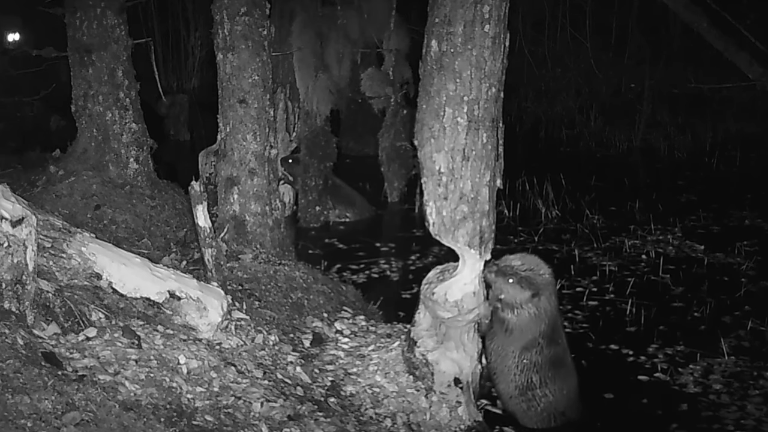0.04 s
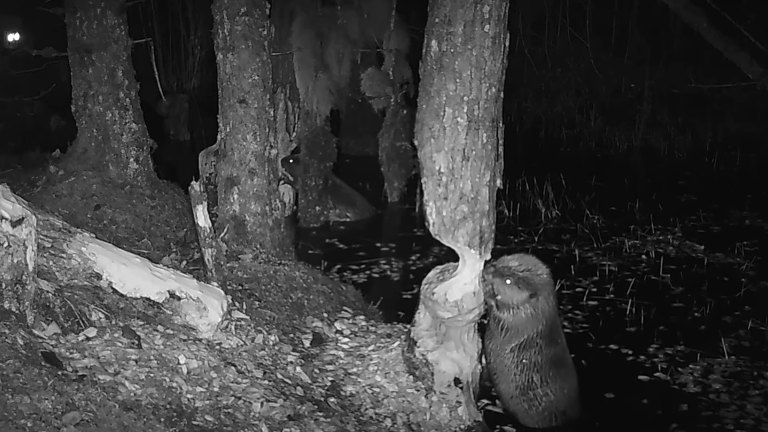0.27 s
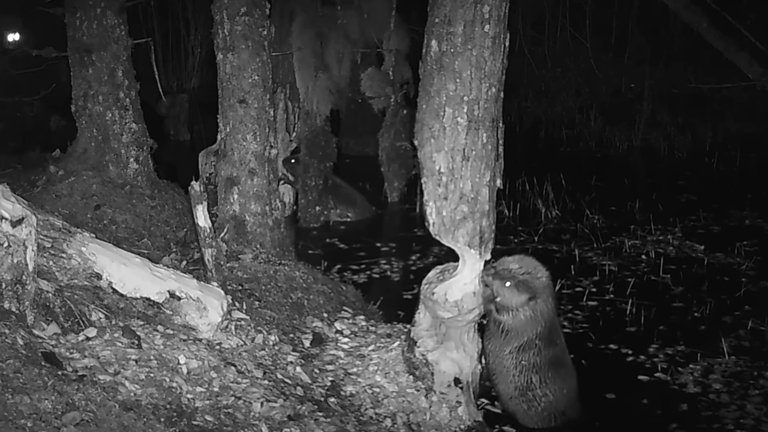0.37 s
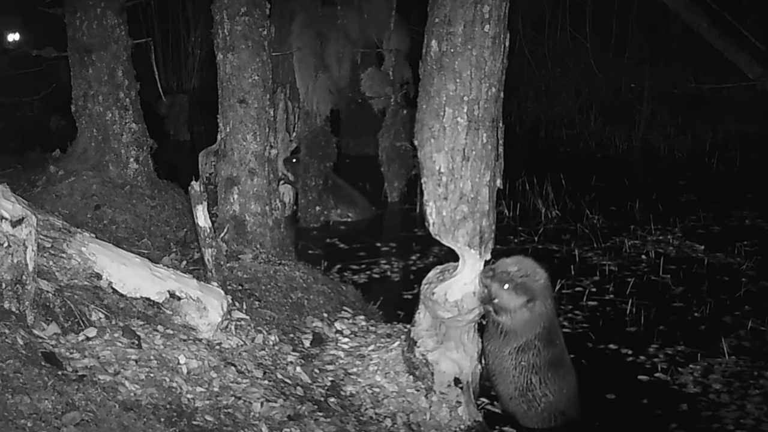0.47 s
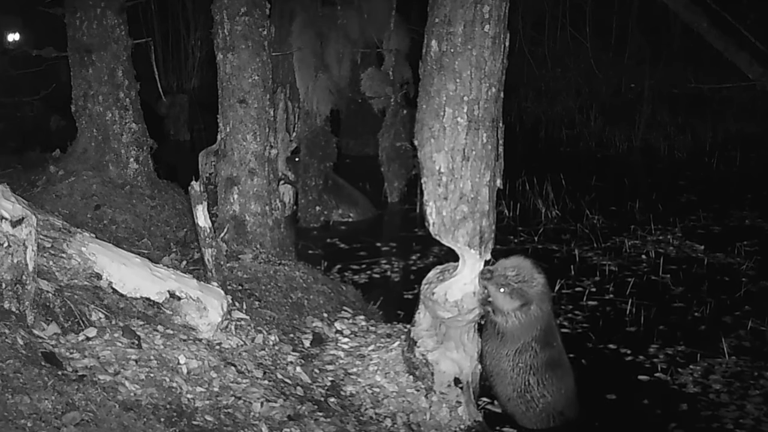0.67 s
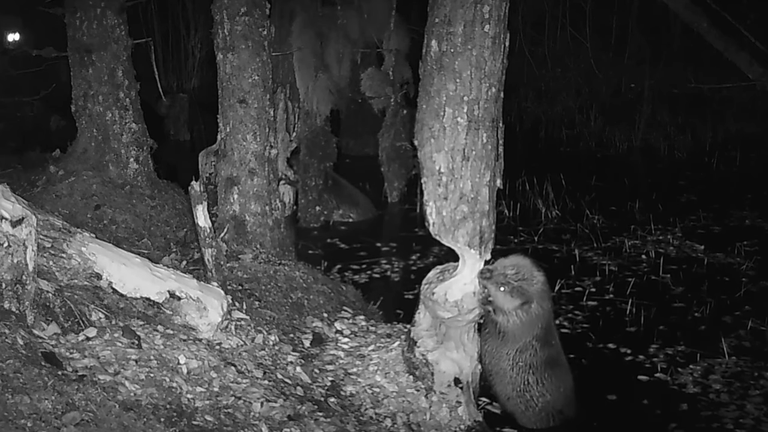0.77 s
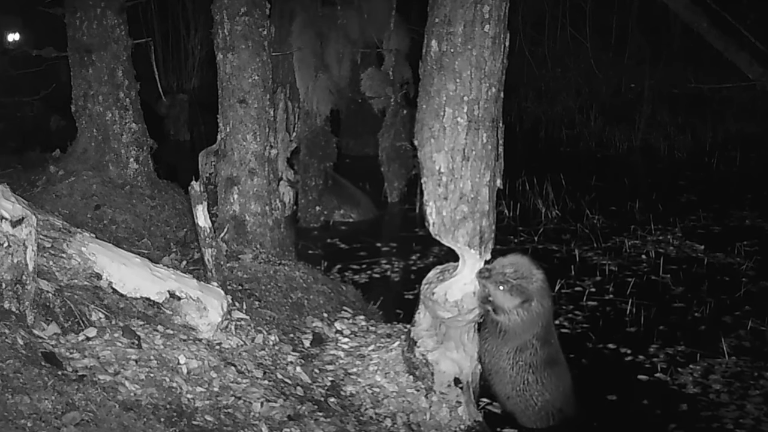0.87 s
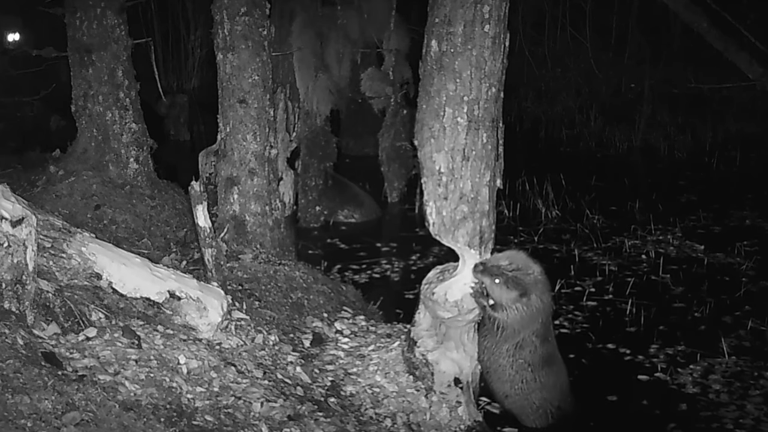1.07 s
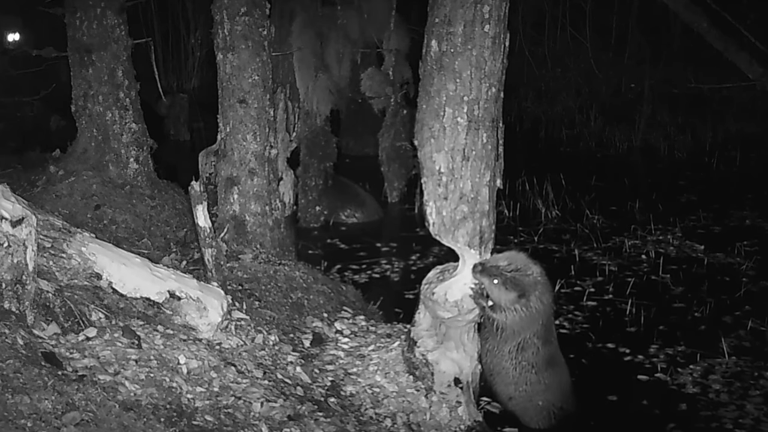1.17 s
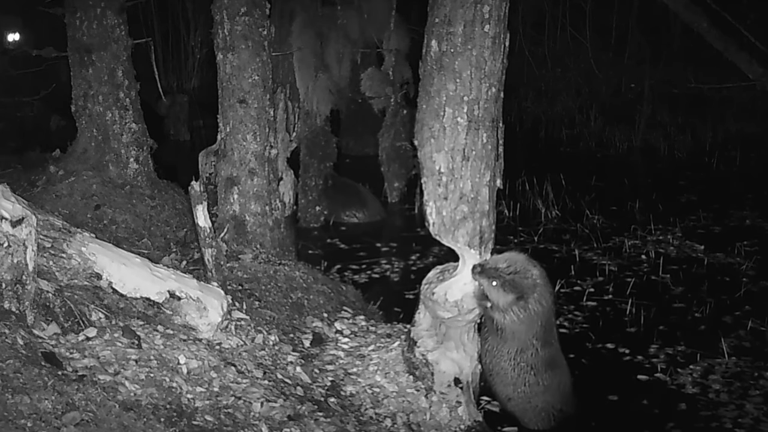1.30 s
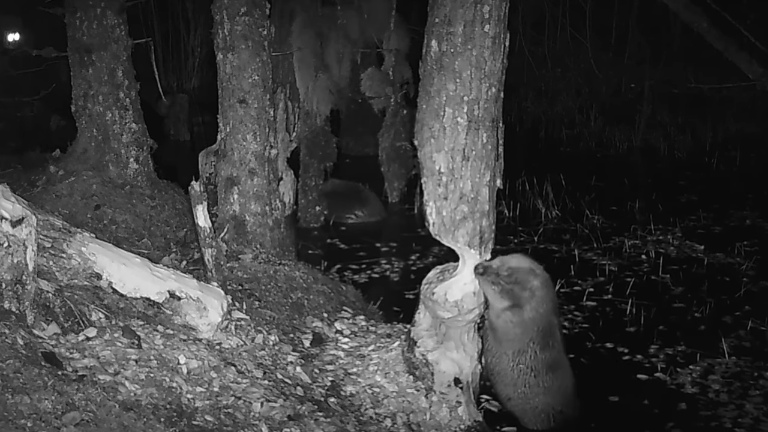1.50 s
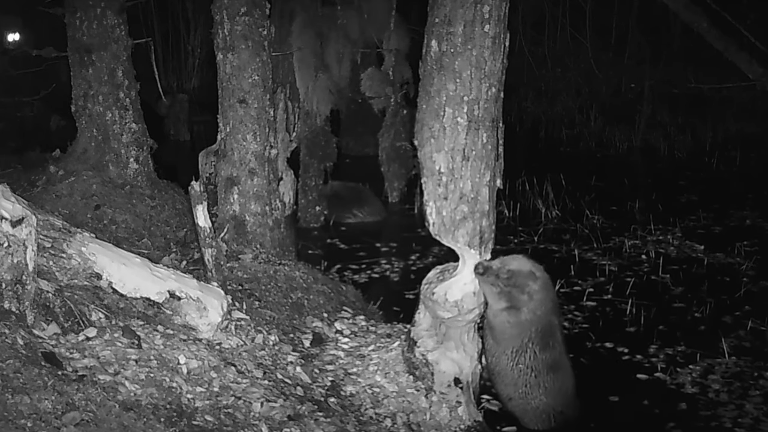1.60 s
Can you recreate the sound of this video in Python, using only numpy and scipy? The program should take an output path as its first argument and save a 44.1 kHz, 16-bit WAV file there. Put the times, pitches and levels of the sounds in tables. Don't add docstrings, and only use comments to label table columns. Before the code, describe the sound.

A beaver gnawing a tree trunk: two sharp wood snaps, then faint nibbles, over chirps and hiss

```python
import sys
import numpy as np
from scipy import signal
from scipy.fft import rfft, irfft
from scipy.io import wavfile

SR = 44100
rng = np.random.default_rng(int(sys.argv[2]) if len(sys.argv) > 2 else 0)


def waveform_to_disk(signal):
    frames = np.transpose(np.atleast_2d(signal))
    scaled = np.clip(frames, -1, 1) * 32767
    samples = np.round(scaled).astype(np.int16)
    wavfile.write(sys.argv[1], SR, samples)


def to_linear_factor(level_db):
    exponent = np.asarray(level_db, float) / 20
    return 10 ** exponent


N = 72765


def at_hz(points, hz):
    points_hz, points_db = np.transpose(points)
    return np.interp(np.log(hz), np.log(points_hz), points_db)


def rms_one(x):
    return x / np.sqrt(np.mean(x ** 2) + 1e-20)


def drift(rate_hz):
    pole = np.exp(-2 * np.pi * rate_hz / SR)
    white = rng.standard_normal(N + SR)
    return rms_one(signal.lfilter([1], [1, -2 * pole, pole * pole], white)[SR:])


def ring(clicks, hz, t60_s):
    pole, w = to_linear_factor(-60 / (t60_s * SR)), 2 * np.pi * hz / SR
    return signal.lfilter([0, np.sin(w)], [1, -2 * pole * np.cos(w), pole * pole], clicks + 1e-18)


def buzz():
    rate_hz, start_s, width_turns = 58.7, .0063, .11
    turn = (np.arange(N) / SR - start_s) * rate_hz % 1 - .5
    return np.exp(-.5 * ((.5 - abs(turn)) / width_turns) ** 2)


def hiss():
    # frequency in Hz, density in dB per Hz.
    colour = [(18, -40), (30, -13.5), (279, -5.5), (883, 1), (2950, -3), (5540, -9.5), (5990, -10.5),
              (9860, -13), (15800, -22.5)]
    level_db, patchy_db = -49.5, .78
    edges_hz = 22 * 2 ** np.arange(0, 9.7, .5)
    white = rng.standard_normal((2, N + SR))
    bump, out = buzz(), np.zeros(N)
    for k, (low_hz, high_hz) in enumerate(zip(edges_hz, edges_hz[1:])):
        band_filter = signal.butter(2, [low_hz, high_hz], "band", fs=SR, output="sos")
        band = signal.sosfilt(band_filter, white[k % 2])[SR:]
        mid_hz = np.sqrt(low_hz * high_hz)
        lift_db = at_hz([(1500, 1), (6000, 4)], mid_hz)
        out += band * to_linear_factor(at_hz(colour, mid_hz) + lift_db * bump + patchy_db * drift(21))
    return to_linear_factor(level_db) * rms_one(out)


def whistles():
    # frequency in Hz, level in dB rms.
    high_tones = [(6029, -77), (6557, -79), (7440, -80), (7494, -78), (7537, -78), (7655, -79), (7773, -79),
                  (7849, -80), (8495, -80), (9179, -82), (9620, -81), (9905, -82), (12134, -88),
                  (14433, -88)]
    # frequency in Hz, level in dB rms.
    low_tones = [(59.2, -78.5), (861.3, -72.5), (1448, -67)]
    trim_db, waver_hz, chop_db = -1, 3, 7
    out = np.zeros(N)
    for hz, db in [*high_tones, *low_tones]:
        turns = np.cumsum(hz + waver_hz * drift(8.4)) / SR + rng.random()
        out += to_linear_factor(db + trim_db) * np.sqrt(2) * np.sin(2 * np.pi * turns)
    return rms_one(to_linear_factor(chop_db * buzz())) * out


def chirps(rows, lead_s, length_s, swell_db, gap_db, glide_hz):
    edge_s, octave_db = .002, -13
    catch_place, catch_width = .55, .07
    t, out = np.arange(N) / SR, np.zeros(N)
    waver_hz = 55 * drift(120)
    for start_s, hz, db in rows:
        share = (t - start_s - lead_s) / length_s
        gate = np.clip(np.minimum(share, 1 - share) * length_s / edge_s, 0, 1)
        catch_db = gap_db * np.exp(-.5 * ((share - catch_place) / catch_width) ** 2)
        phase = 2 * np.pi * np.cumsum(hz + waver_hz + glide_hz * (share - .5)) / SR
        level = to_linear_factor(db + swell_db * (np.clip(share, 0, 1) - .5) + catch_db)
        tone = np.sin(phase) + to_linear_factor(octave_db) * np.sin(2 * phase)
        out += gate * level * np.sqrt(2) * tone
    return out


def low_chirps():
    # start in seconds, pitch in Hz, level in dB.
    chirp_rows = [(0.075, 2632, -54.6), (0.125, 2648, -53.7), (0.375, 2557, -53.2), (0.475, 2643, -53.3),
                  (0.625, 2508, -52.8), (0.675, 2562, -55.0), (0.875, 2610, -53.0), (1.075, 2675, -53.9),
                  (1.125, 2637, -52.1), (1.275, 2664, -53.4), (1.375, 2600, -52.7), (1.475, 2659, -52.4),
                  (1.625, 2487, -53.1)]
    return chirps(chirp_rows, lead_s=-.002, length_s=.027, swell_db=4, gap_db=-1.5, glide_hz=50)


def high_chirps():
    # start in seconds, pitch in Hz, level in dB.
    chirp_rows = [(0.025, 2982, -52.5), (0.175, 2971, -53.6), (0.325, 2906, -53.9), (0.425, 2987, -55.3),
                  (0.525, 2923, -51.9), (0.575, 3014, -51.6), (0.725, 2890, -53.3), (0.775, 3025, -50.7),
                  (0.825, 3106, -55.0), (0.925, 2874, -53.3), (0.975, 3073, -52.3), (1.025, 3073, -52.5),
                  (1.175, 2987, -52.8), (1.225, 3063, -53.2), (1.325, 2874, -52.9), (1.425, 2944, -56.1),
                  (1.525, 2896, -50.6), (1.575, 3025, -51.9)]
    return chirps(chirp_rows, lead_s=.001, length_s=.022, swell_db=1.5, gap_db=-6, glide_hz=-50)


def tooth_squeaks():
    # start in seconds, pitch in Hz, level in dB.
    slides = [
        (1.043, 3750, -59),
        (1.058, 3880, -60),
        (1.252, 3710, -58),
        (1.462, 3740, -56),
        (1.497, 3920, -60),
    ]
    return chirps(slides, lead_s=0, length_s=.022, swell_db=0, gap_db=-6, glide_hz=120)


def crackle(pressure, low_hz, high_hz):
    grains_per_s, spread_db, ring_cycles = 1200, 2.5, 12
    sizes = to_linear_factor(spread_db * np.minimum(rng.exponential(1, N), 4)) * rng.choice([-1, 1], N)
    tears = sizes * (rng.random(N) < grains_per_s / SR)
    dealt, grains = rng.integers(0, 10, N), np.zeros(N)
    for k, hz in enumerate(np.geomspace(low_hz, high_hz, 10)):
        t60_s = ring_cycles / hz
        grains += hz * ring(ring(tears * (dealt == k), hz, t60_s), hz, t60_s)
    times_s, levels_db = np.transpose(pressure)
    return to_linear_factor(np.interp(np.arange(N) / SR, times_s, levels_db)) * rms_one(grains)


def snaps(rows, trim_db):
    # wood mode in Hz, level in dB, t60 in seconds.
    wood = [(2050, -32, .015), (2400, -31, .025), (2900, -28, .03), (3620, -27, .015), (4600, -34, .012)]
    attack_s, release_s, sag_db_per_s, edge_db = .0006, .0004, -1200, -40
    size = SR // 10
    click, t, out = np.eye(1, size, 8)[0], np.arange(size) / SR, np.zeros(N + SR)
    for start_s, db, hz, hold_s, slide_hz_per_ms in rows:
        attack = np.clip(t / attack_s, 0, 1) ** 1.5
        release = np.exp(-np.maximum(t - attack_s - hold_s, 0) / release_s)
        tone = np.sin(2 * np.pi * (hz + 500 * slide_hz_per_ms * t) * t)
        fibre = attack * release * to_linear_factor(sag_db_per_s * t) * tone
        body = sum(to_linear_factor(mode_db + 2 * rng.standard_normal()) * ring(click, mode_hz, t60_s)
                   for mode_hz, mode_db, t60_s in wood)
        edge = to_linear_factor(edge_db) * ring(click, hz * 1.4, .002)
        first = int(start_s * SR)
        out[first:first + size] += to_linear_factor(db + trim_db) * (fibre / abs(fibre).max() + body + edge)
    return signal.sosfilt(signal.butter(3, [1600, 7500], "band", fs=SR, output="sos"), out[:N])


def nibbling():
    # start in seconds, peak in dB, starting pitch in Hz, hold in seconds, slide in Hz per ms.
    bites = [
        (0.396, -40, 2320, 0.0015, 10.5),
        (1.4094, -42, 4060, 0.0013, 10.5),
        (1.4594, -39, 3700, 0.0015, 10.5),
        (1.4824, -42, 2730, 0.0016, 10.5),
        (1.508, -43, 3940, 0.0015, 10.5),
        (1.516, -41, 2870, 0.0015, 12),
        (1.5504, -39, 2350, 0.0015, 10.5),
        (1.5724, -41, 3040, 0.0015, 10.5),
    ]
    # time in seconds, tooth pressure level in dB.
    light_pressure = [
        (1.39, -80),
        (1.415, -61),
        (1.44, -64),
        (1.46, -61),
        (1.52, -62),
        (1.54, -66),
        (1.575, -54.5),
        (1.6, -65),
        (1.65, -70),
    ]
    return snaps(bites, trim_db=-5.5) + crackle(light_pressure, low_hz=3450, high_hz=4800)


def tooth_slips():
    # start in seconds, peak in dB, starting pitch in Hz, hold in seconds, slide in Hz per ms.
    tears = [(0.2211, -14, 3500, .0006, 100), (0.2225, -20.5, 3640, .0012, 0),
             (0.2242, -28, 3600, .0010, -150), (0.2211, -38, 5100, .0002, 0), (0.2125, -44, 6300, .0005, 0),
             (0.2564, -13, 2780, .0023, 260), (0.2565, -27, 2050, .0018, 0), (0.2599, -27, 3600, .0008, 50),
             (0.2627, -32, 3350, .0005, -50), (0.2151, -32, 4000, .0004, 0), (0.2173, -35, 3550, .0018, 50),
             (0.2263, -35, 2900, .001, 0), (0.2281, -35, 3350, .0018, -50), (0.2310, -36, 4400, .0016, 50),
             (0.2388, -33, 3300, .0005, 0), (0.2404, -35, 3200, .0012, 50),
             (0.2426, -38, 3200, .0015, -150), (0.2846, -33, 2350, .001, 100),
             (0.2938, -38, 5000, .0003, 0), (0.2858, -34, 3200, .0005, 100), (0.2937, -28, 3500, .0002, 0),
             (0.2948, -35, 3600, .0008, 50)]
    # time in seconds, tooth pressure level in dB.
    hard_pressure = [
        (0.205, -77),
        (0.213, -45),
        (0.235, -45),
        (0.25, -47),
        (0.265, -45.5),
        (0.28, -43),
        (0.298, -45),
        (0.31, -52),
        (0.36, -81),
    ]
    return snaps(tears, trim_db=0) + crackle(hard_pressure, low_hz=2610, high_hz=4160)


def scene():
    noise_floor = hiss() + whistles()
    chirp_rows = low_chirps() + high_chirps()
    beaver = tooth_squeaks() + nibbling() + tooth_slips()
    return (noise_floor + chirp_rows + beaver)[None]


def top_cut(x):
    return signal.sosfilt(signal.butter(12, 15990, fs=SR, output="sos"), x)


def record(dry):
    # centre in Hz, width in Hz, depth in dB.
    dips = [(5475, 340, -30), (10940, 750, -20), (13030, 600, -21)]
    wander_db, top_hz, top_db, cutoff_hz = 10, 15000, -4, 15780
    x = dry
    for hz, width_hz, db in dips:
        w, a = 2 * np.pi * hz / SR, np.pi * width_hz / SR
        notched = signal.lfilter([1, -2 * np.cos(w), 1], [1 + a, -2 * np.cos(w), 1 - a], x)
        left = np.minimum(to_linear_factor(db + wander_db * drift(2)), 1)
        x = notched + (x - notched) * left
    top = signal.lfilter(*signal.iirpeak(top_hz, 14, fs=SR), x)
    x = x - top * (1 - np.minimum(to_linear_factor(top_db + wander_db * drift(2.2)), 1))
    spectrum = rfft(x)
    bins_hz = np.arange(spectrum.shape[-1]) * SR / N
    mix = irfft(spectrum * (bins_hz < cutoff_hz), N)
    return top_cut(mix)


dry = scene()
out = record(dry)
waveform_to_disk(out)
```